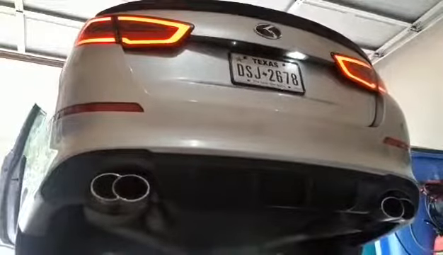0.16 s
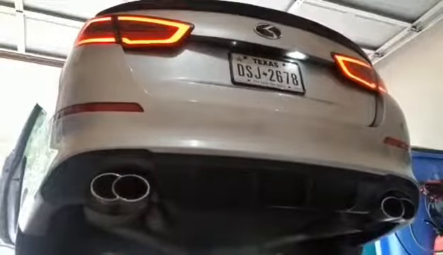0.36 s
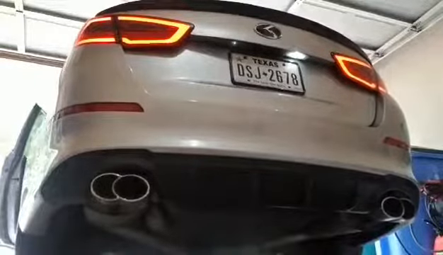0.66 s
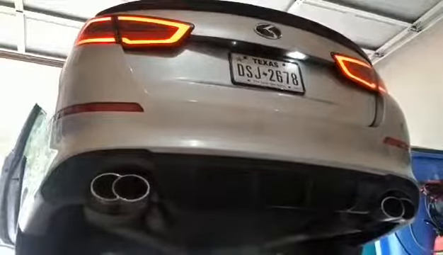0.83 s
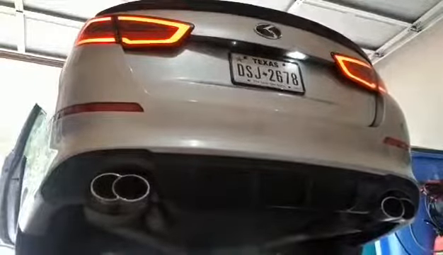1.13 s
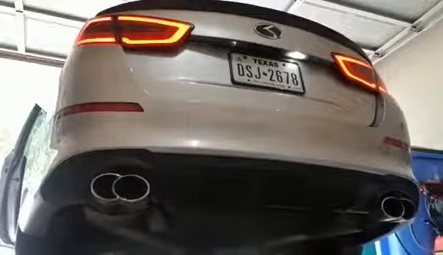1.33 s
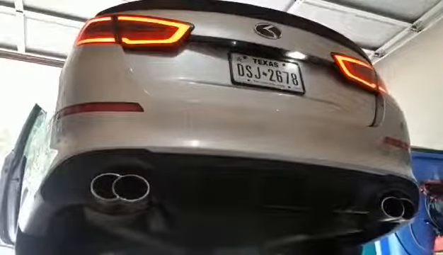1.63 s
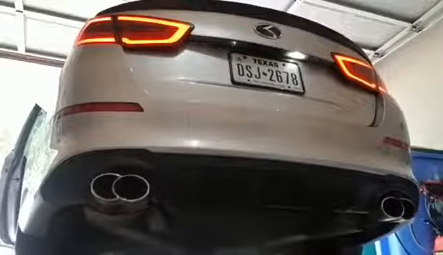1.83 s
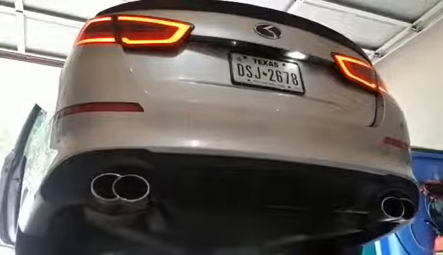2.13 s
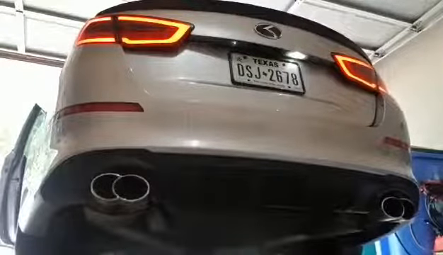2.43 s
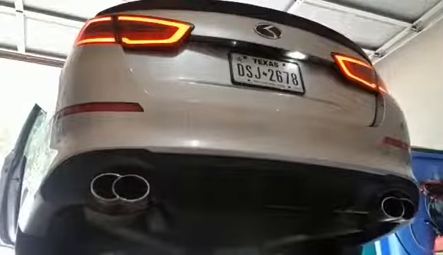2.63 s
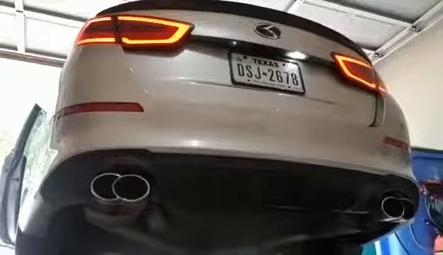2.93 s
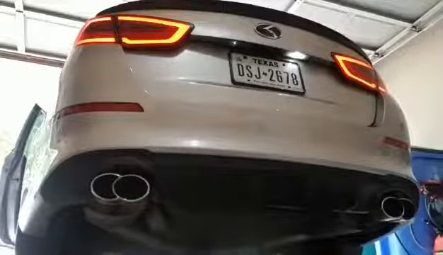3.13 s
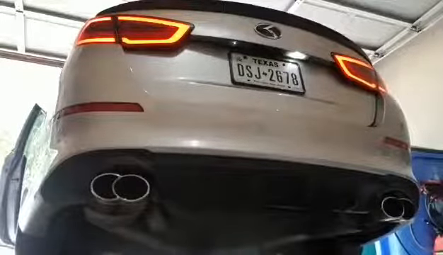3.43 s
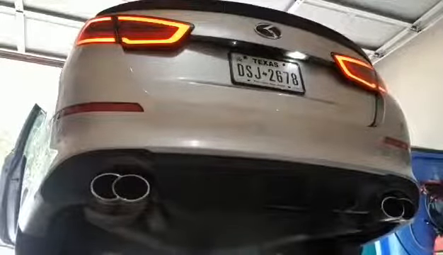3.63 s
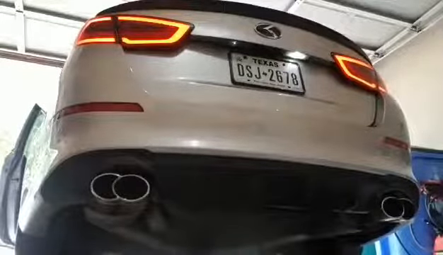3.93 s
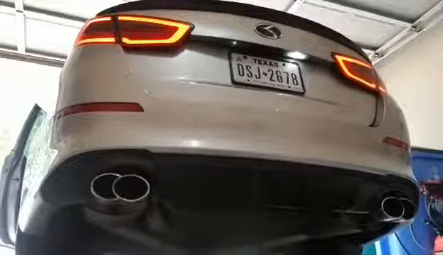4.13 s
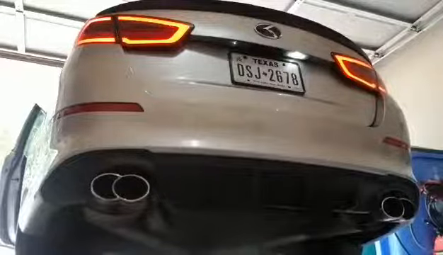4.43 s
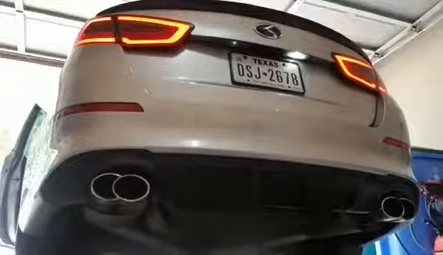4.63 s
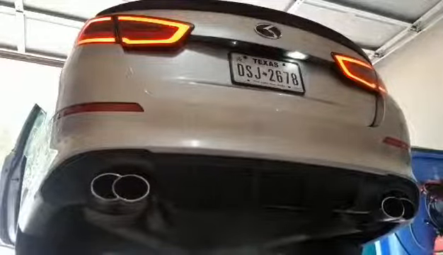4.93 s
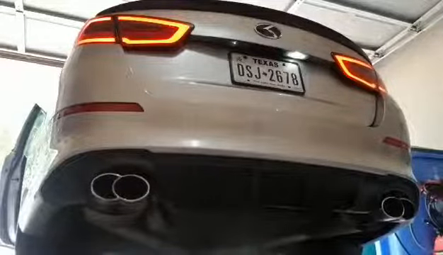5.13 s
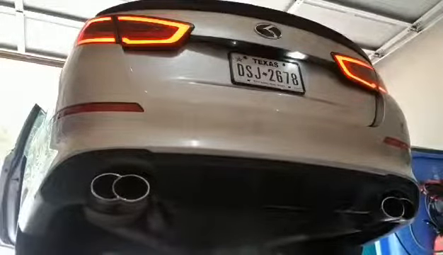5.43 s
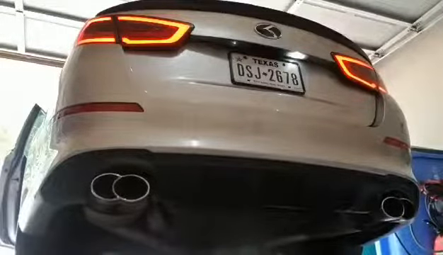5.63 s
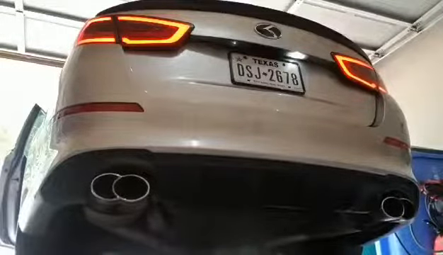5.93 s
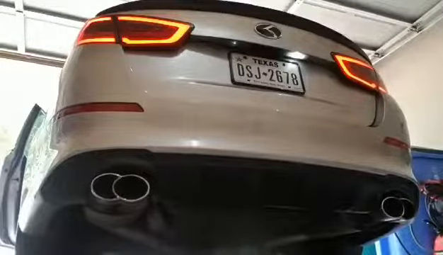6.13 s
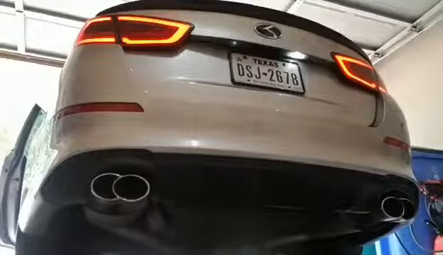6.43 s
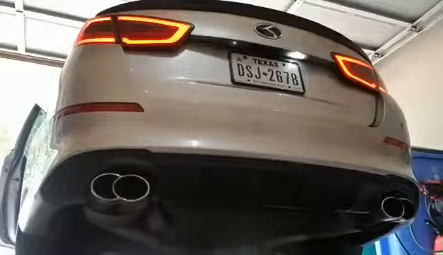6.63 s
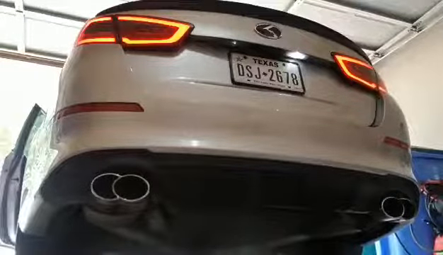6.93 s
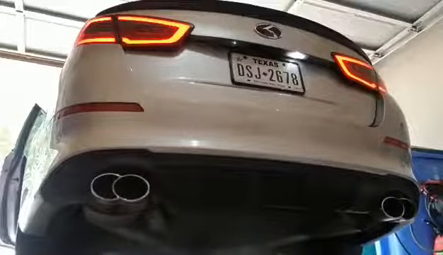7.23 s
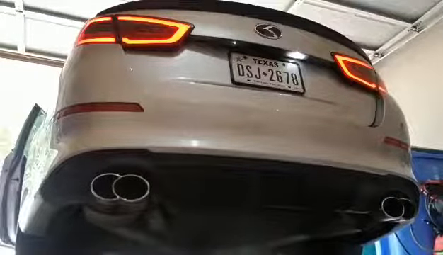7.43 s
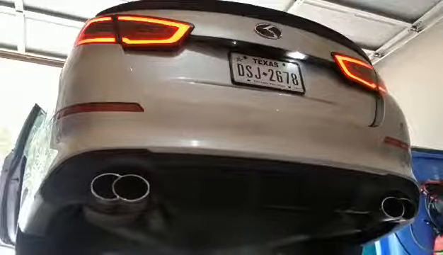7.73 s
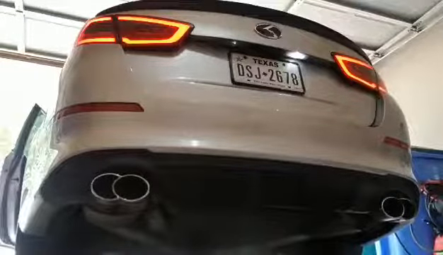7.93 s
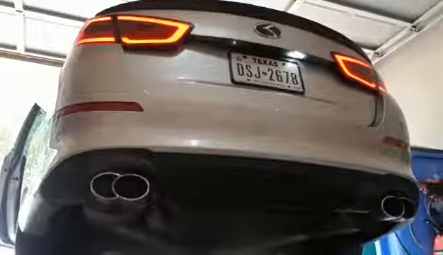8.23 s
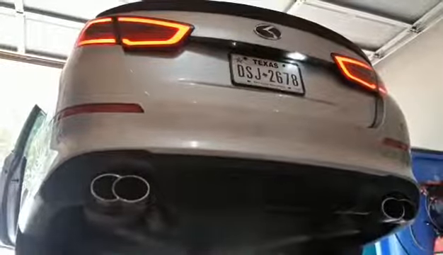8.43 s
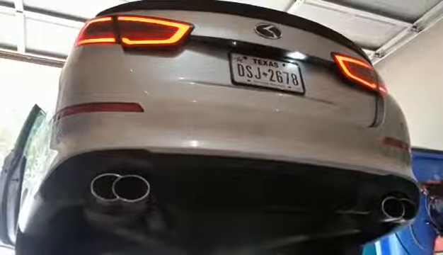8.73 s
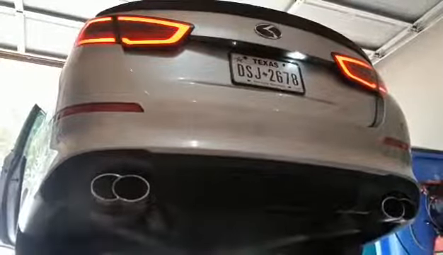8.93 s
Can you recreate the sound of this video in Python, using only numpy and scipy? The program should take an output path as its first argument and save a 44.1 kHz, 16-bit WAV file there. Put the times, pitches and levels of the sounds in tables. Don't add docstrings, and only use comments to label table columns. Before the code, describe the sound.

From 0 to about 4.4 seconds a four-cylinder turbo engine idles steadily, heard close behind its tailpipes in a garage: a deep, pulsing burble at roughly 29 firings a second, slightly uneven between cylinders, with hollow rasp, soft gas flow and rumble. At 4.4 it revs smoothly, doubling in pitch by 5.26, then cuts briefly with a small pop and thump and sinks. From about 6.1 a second blip rises faster, turning raspy and snarling by 6.75, with several cracks as it lifts until 6.9. After a softer dip near 7.2, the third climbs long and hard to a loud, buzzing peak at 8.3. The throttle shuts: a fluttering whistle near 6.5 kilohertz bursts out, sinks and fades by about 8.9, amid loud crackles and thumps from 8.36 to 8.75. The pitch falls, then lifts slightly after 8.9 with faint last pops. Short wall reflections surround the rasp.

```python
import sys
import numpy as np
from scipy import signal
from scipy.fft import rfft, irfft, next_fast_len
from scipy.io import wavfile
from scipy.ndimage import uniform_filter1d

SR = 44100
rng = np.random.default_rng(int(sys.argv[2]) if len(sys.argv) > 2 else 0)


def boost(x):
    u = np.asarray(x, float) / 20
    return 10 ** u


def dump(signal):
    limited = np.clip(np.atleast_2d(signal).T, -1, 1)
    pcm = np.round(limited * 32767).astype(np.int16)
    wavfile.write(sys.argv[1], SR, pcm)


N = 399987
T = np.arange(N) / SR
IDLE_HZ = 29.0


def evened(x):
    return x / np.sqrt(np.mean(x ** 2) + 1e-20)


def steadied(x):
    return x / np.sqrt(abs(uniform_filter1d(x ** 2, size=8000)) + 1e-14)


def read(points, hz):
    f, value = np.transpose(points)
    return np.interp(np.log(hz + 1), np.log(f + 1), value)


def curve(points):
    return np.interp(T, *np.transpose(points))


def spells(rows, edge_s):
    total_db = 0
    for start, length, db in rows:
        inside = np.minimum(T - start, start + length + edge_s - T)
        total_db = total_db + db * np.clip(inside / edge_s, 0, 1)
    return total_db


def wander(hz):
    lowpass = signal.butter(2, hz, fs=SR, output="sos")
    return evened(signal.sosfilt(lowpass, rng.standard_normal(N)))


def resonate(x, hz, width):
    turn = np.exp(2j * np.pi * np.cumsum(hz * np.ones(len(x))) / SR)
    r = np.exp(-np.pi * width / SR)
    return 2 * (turn * signal.lfilter([1 - r], [1, -r], x / turn + 1e-18)).real


def body(x, modes):
    out = 0
    for k, (hz, width, db) in enumerate(modes):
        once = resonate(x, hz, 1.35 * width)
        out = out + (-1) ** k * boost(db) * resonate(once, hz, 1.35 * width)
    return out


# frequency in Hz, left-right correlation.
LIKENESS = [(60, 1.0), (130, 0.99), (280, 0.91), (610, 0.75), (1330, 0.16), (2890, -0.09), (6270, -0.0),
            (13600, 0.09)]


def noise(spectrum, patchy_db):
    frames, hz = N // 256 + 5, np.fft.rfftfreq(1024, 1 / SR)
    a, b, c, d, patches = rng.standard_normal((frames, 513, 5)).T
    patches = uniform_filter1d(patches, size=12, axis=0)
    patches = evened(uniform_filter1d(patches, size=10, axis=1))
    same = np.clip(read(LIKENESS, hz), -1, 1)[:, None]
    left = a + 1j * b
    right = same * left + np.sqrt(1 - same ** 2) * (c + 1j * d)
    level_db = np.where(hz < spectrum[0][0], -90, read(spectrum, hz))
    z = np.array([left, right]) * boost(level_db[:, None] + patchy_db * patches)
    return signal.istft(z, nperseg=1024, noverlap=768)[1][:, :N]


# frequency in Hz, time to fall by 60 dB in seconds.
GARAGE_DECAY = [(200, 0.84), (1000, 0.5), (4000, 0.08), (12000, 0.11)]


def garage(x):
    taps = np.zeros((2, SR // 2))
    at = np.arange(200, SR // 2 - 20, 20) + rng.integers(0, 20, (2, (SR // 2 - 201) // 20))
    np.put_along_axis(taps, at, rng.choice([-1., 1.], at.shape), 1)
    hz, t, z = signal.stft(taps, SR, nperseg=256)
    decay = boost(-60 * t / read(GARAGE_DECAY, hz)[:, None])
    tail = signal.istft(z * decay, SR, nperseg=256)[1]
    return signal.fftconvolve(x[None], tail / np.linalg.norm(tail[0]), axes=1)[:, :N]


# frequency in Hz, density in dB per Hz.
RUMBLE_SPECTRUM = [(15, 4), (40, -10), (60, 4), (100, 5), (135, -8), (200, -14), (350, -31.5), (700, -56.5),
                   (1500, -110)]


def rumble(rasp_db):
    return boost(-37 + .25 * (rasp_db + 47)) * evened(noise(RUMBLE_SPECTRUM, patchy_db=1.5))


# frequency in Hz, density in dB per Hz.
HISS_SPECTRUM = [(3000, -18), (5000, -6), (6500, -1.5), (7500, -8.5), (8500, -13), (10500, -8.5),
                 (13000, -8.5)]


def hiss(gas_db, pressure_db):
    level_db = -72 + 0.94 * gas_db + 0.12 * pressure_db
    return boost(level_db + 10.5) * evened(noise(HISS_SPECTRUM, patchy_db=1.2))


# frequency in Hz, density in dB per Hz.
FLOW_SPECTRUM = [(180, -35), (300, -9.5), (445, -12), (513, -2.5), (761, -23.5), (979, -9.5), (1450, -19.5),
                 (2690, -18.5), (3680, -25), (6390, -33), (7600, -38), (13000, -49.5)]


def flow(gas_db, firings):
    beat = 1 + .25 * np.cos(2 * np.pi * (firings - .62))
    level_db = -57.5 + 0.64 * gas_db
    return boost(level_db + 9) * beat * evened(noise(FLOW_SPECTRUM, patchy_db=.9))


# factor on the centre frequency, level in dB.
WHISTLE_LINES = [(1.0, -3), (.978, -9), (.943, -13), (1.055, -12)]


def vent():
    start_s, rise_s, hold_s, sag_s = 8.255, 0.047, 0.32, 0.31
    t = T - start_s
    level_db = -18 - 28.5 * np.clip(t, 0, hold_s) - 71 * np.maximum(t - hold_s, 0)
    hz = 6825 - 411 * np.clip(t / sag_s, 0, 1) + 149 * np.clip(2 * (t / sag_s - 1), 0, 1)
    sides = []
    for side_db in (-1.5, 1.5):
        lines = 0
        for factor, db in WHISTLE_LINES:
            line = resonate(rng.standard_normal(N), hz * factor, 16)
            lines = lines + boost(db) * evened(resonate(line, hz * factor, 16))
        fuzz = rng.standard_normal(N)
        for _ in range(3):
            fuzz = resonate(fuzz, hz, 900)
        sides.append(boost(side_db) * (lines + .55 * evened(fuzz)))
    flutter = boost(1.5 * wander(70.1))
    return np.array(sides) * flutter * boost(level_db) * np.clip(t / rise_s, 0, 1) ** 3


# start in seconds, crack level in dB, thump level in dB.
AFTERFIRE = [(5.29, -34, -17), (5.326, -23, -26.5), (6.58, -32, -45.5), (6.606, -15, -47),
             (6.77, -6.5, -25), (6.818, -17.5, -15.5), (6.859, -1.5, -28), (6.884, -20, -23.5),
             (6.917, -31, -28.5), (8.362, -16, -15), (8.388, -1, -9.5), (8.418, -9, -13), (8.438, 8.5, -16),
             (8.484, -5.5, -15.5), (8.502, -14.5, -17), (8.541, 6, -22), (8.578, -31, -18.5),
             (8.695, 5, -16.5), (8.749, -21.5, -32.5), (8.905, -24, -17), (8.947, -37, -28.5),
             (9.026, -24.5, -24)]
# frequency in Hz, width in Hz, level in dB.
MUFFLER_MODES = [(60.5, 26, 1), (94, 22.5, 1), (149.5, 37, -11.5)]
# frequency in Hz, width in Hz, level in dB.
PIPE_END = [(460, 69, -0.5), (635, 177, -2), (1160, 230, -8.5)]


def pops():
    cracks, pushes, t = np.zeros(N), np.zeros(N), np.arange(600) / SR
    for start, crack_db, thump_db in AFTERFIRE:
        at = round(start * SR)
        burst = .4 * rng.standard_normal(600) * np.exp(-t / .0015)
        front = np.exp(-((t - .0003) / .00006) ** 2)
        cracks[at:at + 600] += boost(crack_db) * (burst + front)
        pushes[at + 130] += boost(thump_db)
    crack = boost(14) * body(cracks, PIPE_END + [(2500, 1200, -31)])
    return crack, boost(55) * body(pushes, MUFFLER_MODES)


CYLINDER_LEVELS = [-1, 2, -1, 0]
# frequency in Hz, width in Hz, level in dB.
TAILPIPE_MODES = [(433, 50, 1), (520, 160, -4.5), (654, 74, -5), (726, 250, -4.5), (862, 83, -5.5),
                  (1190, 120, -12), (1900, 190, -22)]


def rasp(firings, firing_hz, level_db, sharp, knock):
    late = firings - np.interp(firing_hz, [30, 55], [.34, 1.0])
    count = np.maximum.accumulate(np.floor(late).astype(int) + 1)
    cylinder_db = np.array(CYLINDER_LEVELS)[(count - 1) % len(CYLINDER_LEVELS)]
    sharp = np.clip(sharp, 0, 1)
    chance = rng.standard_normal(count[-1] + 2)[count]
    size = boost(2.8 * sharp ** 2 * chance + cylinder_db)
    pulse = np.hanning(26)
    fronts = signal.oaconvolve(size * np.diff(count, prepend=count[0]), pulse, "same")
    puffs = np.sqrt(size) * (.1 + np.exp(-(late % 1) / .25)) * rng.standard_normal(N)
    puffs = evened(puffs) - knock * np.sqrt(SR / IDLE_HZ) * fronts / pulse.sum()
    shell = .5 * knock * steadied(body(fronts, [(518, 50, 0)]))
    snap = sharp * steadied(body(fronts, PIPE_END))
    breath = np.sqrt(1 - sharp ** 2) * steadied(body(puffs, TAILPIPE_MODES))
    return boost(level_db) * (shell + snap + breath)


# frequency in Hz, level in dB.
LOW_RESPONSE = [(29, -53), (44, -25.5), (57, -11.5), (87, -14.5), (106, -20), (125, -28), (155, -19.5),
                (200, -37.5)]
# frequency in Hz, width in Hz, change in dB.
CANCELLATIONS = [(75.5, 2.9, -10), (115.2, 2.45, -14.5), (137, 5.4, -4), (201.4, 7.4, -12), (230.1, 12, 10),
                 (276.3, 16, -4.5), (430, 60, 4)]


def exhaust(hz):
    response_db = read(LOW_RESPONSE, hz)
    for centre, width, db in CANCELLATIONS:
        response_db = response_db + db * np.exp(-((hz - centre) / width) ** 2)
    return response_db


# frequency in Hz, level in dB.
HIGH_RESPONSE = [(40, -54), (75, -52), (116, -43), (145, -34), (174, -44), (203, -62), (232, -51),
                 (262, -62), (320, -67), (348, -60), (380, -68), (455, -66), (515, -61), (600, -68)]
# frequency in Hz, lead in radians.
PHASE_LEAD = [(56, 0), (87, 1.05), (106, 0)]
# level in dB, dB gained per dB of combustion.
LOW_ORDERS = [(2, 0.92), (0, 1.14), (-5, 1.5)]
# start in seconds, length in seconds, dB added.
LOPE_SPELLS = [
    (6.65, .22, 50),
    (7.66, 0.79, 33),
    (8.03, 0.14, 9.5),
]


def boom(firings, firing_hz, pressure_db, load_db):
    angle = 2 * np.pi * firings
    lope_db = -45.5 + spells(LOPE_SPELLS, edge_s=0.071) + exhaust(firing_hz / 2)
    out = boost(lope_db) * np.cos(angle / 2)
    stumble_db = 3.5 * (T > 8.28) * wander(6.4)
    for k, (db, share) in enumerate(LOW_ORDERS, start=1):
        db = db + exhaust(k * firing_hz) + share * pressure_db + stumble_db
        out += boost(db) * np.cos(k * angle + read(PHASE_LEAD, k * firing_hz))
    for twice in range(3, 41):
        if twice % 2 or twice > 6:
            db = read(HIGH_RESPONSE, firing_hz * twice / 2) + load_db - 21.5 * (twice % 2)
            out += boost(db) * np.cos(twice / 2 * angle - twice ** 2 * .05)
    return np.sqrt(2) * out * boost(0.12 * wander(23.0))


# time in seconds, firing rate in Hz.
ENGINE_SPEED = [(4.38, 27.01), (4.68, 34.44), (5.2, 56.08), (5.26, 58.06), (5.35, 53.88), (5.98, 43.66),
                (6.13, 46.2), (6.51, 62), (6.58, 70.8), (6.76, 84.06), (6.83, 79.26), (7.02, 73.56),
                (7.24, 72.57), (7.33, 75.5), (7.7, 105.8), (8.3, 187), (8.9, 137), (9.07, 151.1)]
# time in seconds, level in dB.
COMBUSTION = [(4.45, -0.5), (5.38, 2), (5.65, -5.5), (5.98, -11.5), (6.1, -4.5), (6.33, -2.5), (6.48, 0.5),
              (6.76, 1.5), (7.0, -7), (7.17, -20), (7.3, -7.5), (7.42, -1.5), (7.7, 1), (7.76, -5),
              (8.5, -4.5), (8.62, -6), (8.9, 0.5), (9.07, -8.5)]
# time in seconds, level in dB.
GAS_FLOW = [(4.45, 1), (4.88, 6), (5.06, 11.5), (5.38, 10), (5.68, 3), (6.03, 0), (6.33, 7), (6.62, 18),
            (6.8, 17.5), (7.0, 6), (7.29, 5), (7.55, 14.5), (8.0, 20), (8.2, 24.5), (8.3, 40), (8.55, 38),
            (8.9, 19.5), (9.07, 19)]
# start in seconds, length in seconds, dB added.
SNARL_SPELLS = [(6.585, .19, 13.5), (6.84, 0.15, 11), (7.33, 0.42, 9.5), (7.34, 0.077, 6), (7.58, .09, 7.5),
                (7.72, .76, 6.5), (8.25, .21, 3.5), (8.53, 0.027, 7.5), (8.6, 0.15, 3), (5.32, .05, 6.5),
                (8.9, 0.24, 4.5)]
# start in seconds, length in seconds, change in dB.
MISFIRE_SPELLS = [
    (5.287, 0.038, -18),
    (6.6, 0.013, 3.5),
    (6.815, .03, -20.5),
]


def scene():
    firing_hz = np.maximum(curve(ENGINE_SPEED), IDLE_HZ)
    off_idle = np.clip((firing_hz - IDLE_HZ) / 8.1, 0, 1)
    firings = np.cumsum(firing_hz * (1 + .001 * wander(3.0))) / SR - .035
    pressure_db, gas_db = curve(COMBUSTION), curve(GAS_FLOW)
    snarl_db = spells(SNARL_SPELLS, edge_s=.03)
    misfire_db = spells(MISFIRE_SPELLS, edge_s=0.011)

    pipe_gas_db = np.minimum(gas_db, 29)
    rasp_db = -47.5 + 0.8 * pipe_gas_db + 0.48 * pressure_db + snarl_db + misfire_db
    load_db = 7.5 * off_idle + pressure_db + 0.13 * snarl_db
    sharp = .4 + .3 * off_idle + .011 * pressure_db + .022 * snarl_db

    crack, thump = pops()
    low = boost(misfire_db) * boom(firings, firing_hz, pressure_db, load_db) + thump
    uneven = firings + .009 * off_idle * wander(40)
    tail = rasp(uneven, firing_hz, rasp_db - 1.5 * off_idle, sharp, knock=1.5 * (1 - off_idle)) + crack
    tail = signal.sosfilt(signal.butter(3, 410, "high", fs=SR, output="sos"), tail)

    direct = low + boost(-3.5) * tail
    near = np.array([np.roll(direct, shift=6), direct])
    walls = boost(-14.5) * garage(tail) + boost(-37) * garage(low)
    air = flow(gas_db, firings) + hiss(gas_db, pressure_db) + rumble(rasp_db)
    return near + walls + air + vent()


def thin_treble(x):
    hz, t, z = signal.stft(x, SR, nperseg=2048, noverlap=1536)
    power = (abs(z) ** 2).mean(0) + 1e-16
    narrow, broad = uniform_filter1d(power, size=9, axis=0), uniform_filter1d(power, size=161, axis=0)
    under_db = 10 * np.log10(narrow / broad)
    luck = rng.standard_normal((len(t) // 4 + 1, len(hz) // 10 + 1))
    luck = luck.repeat(4, axis=0).repeat(10, axis=1)[:len(t), :len(hz)].T
    loud = np.clip((10 * np.log10(power[hz > 2500].sum(0)) + 58) / 25, 0, 1)
    empty = (.45 * under_db + 3 * luck < 3.5 * loud - 6.5) & (hz[:, None] > 2900)
    return signal.istft(z * np.where(empty, .04, 1), SR, nperseg=2048, noverlap=1536)[1][:, :N]


def top_cut(x):
    return signal.sosfilt(signal.butter(12, 14200, fs=SR, output="sos"), x)


# frequency in Hz, left minus right in dB.
MICROPHONE_LEAN = [(60, 0.0), (110, -0.5), (200, -0.5), (370, -1.5), (670, -1.5), (1220, -3.5),
                   (2230, -1.0), (4070, -2.0), (7440, -1.5), (13600, 1.0)]


def record(dry):
    size = next_fast_len(N + 4096)
    hz = np.fft.rfftfreq(size, 1 / SR) + 1e-3
    passed = (hz < 13150) / (1 + (37 / hz) ** 6)
    lean = boost(np.outer([.5, -.5], read(MICROPHONE_LEAN, hz)))
    heard = irfft(rfft(dry, size) * lean * passed, size)[:, :N]
    over = np.maximum(abs(heard) - .68, 0)
    heard = heard - np.sign(heard) * (over - .19 * np.tanh(over / .19))
    return top_cut(thin_treble(heard))


dry = scene()
out = record(dry)
dump(out)
```